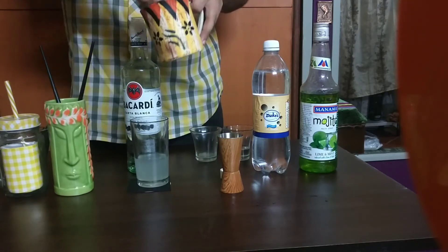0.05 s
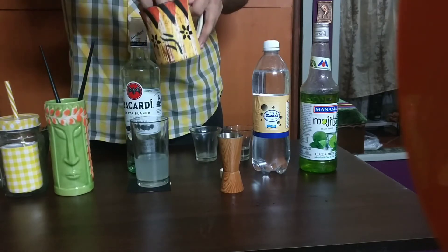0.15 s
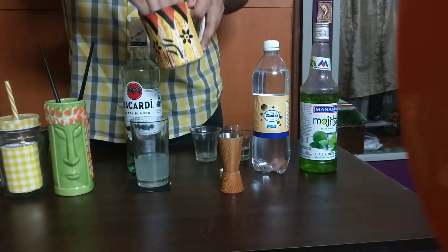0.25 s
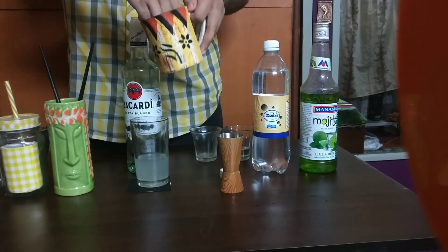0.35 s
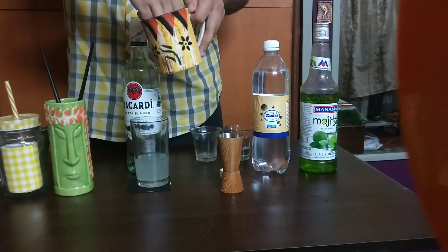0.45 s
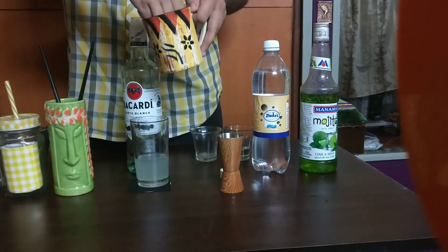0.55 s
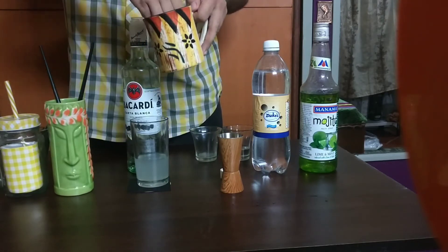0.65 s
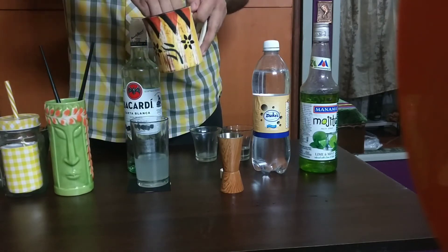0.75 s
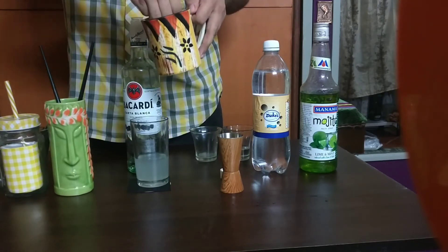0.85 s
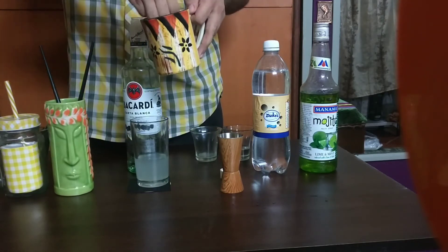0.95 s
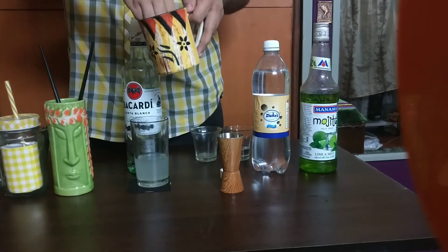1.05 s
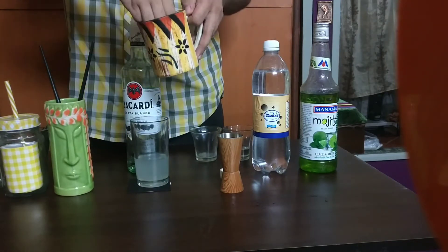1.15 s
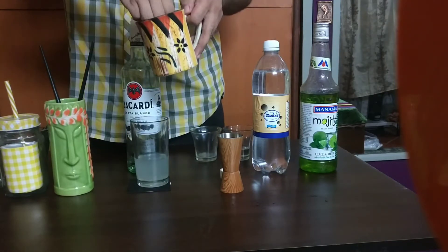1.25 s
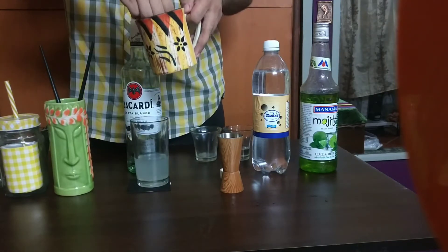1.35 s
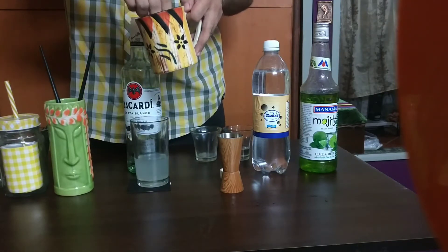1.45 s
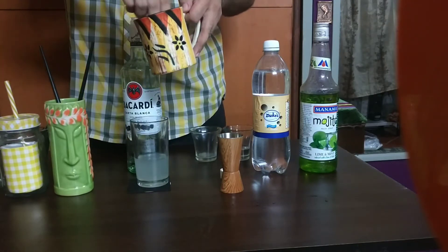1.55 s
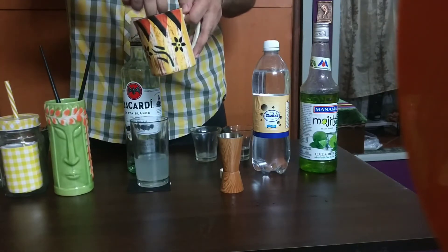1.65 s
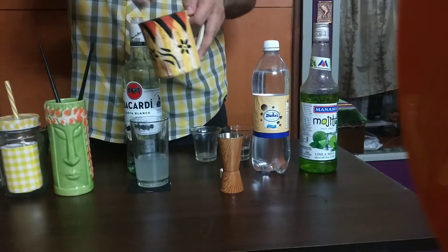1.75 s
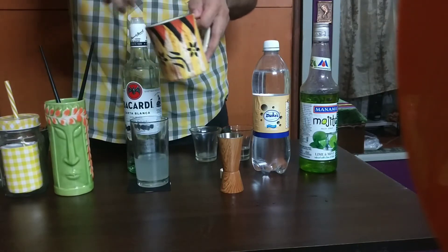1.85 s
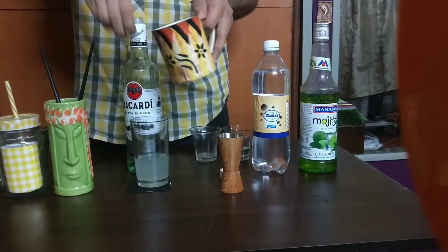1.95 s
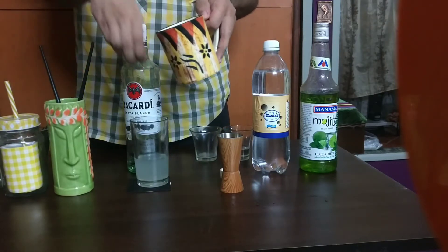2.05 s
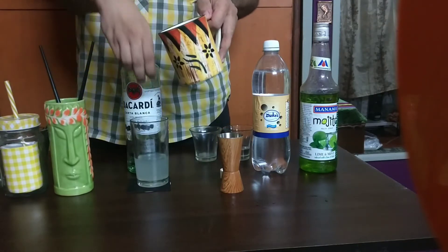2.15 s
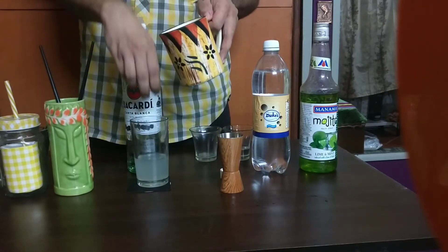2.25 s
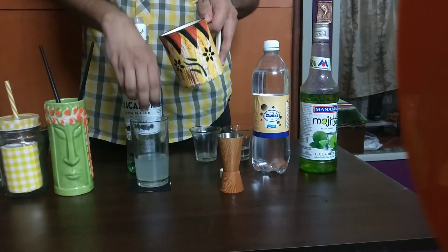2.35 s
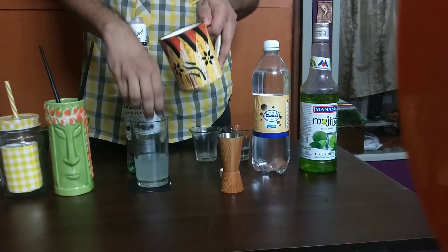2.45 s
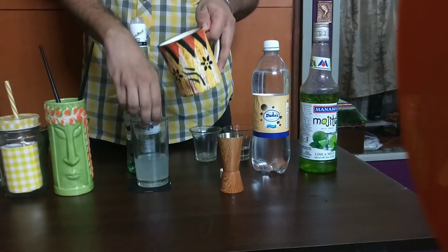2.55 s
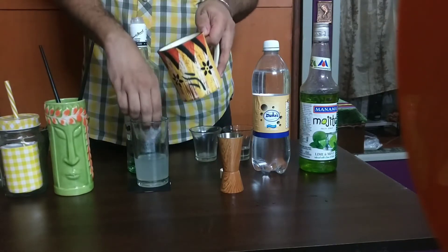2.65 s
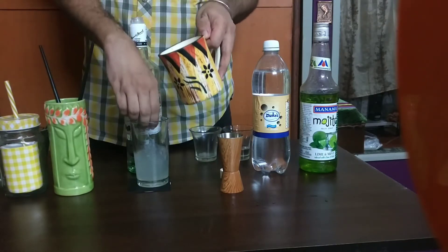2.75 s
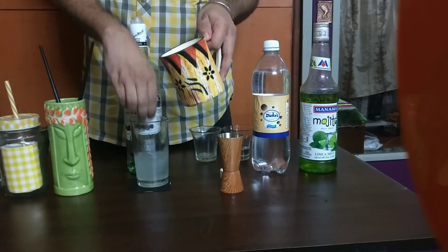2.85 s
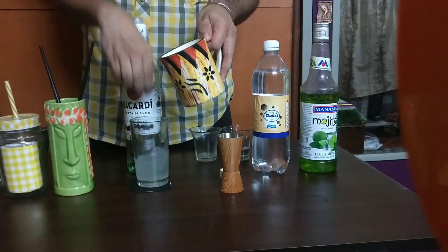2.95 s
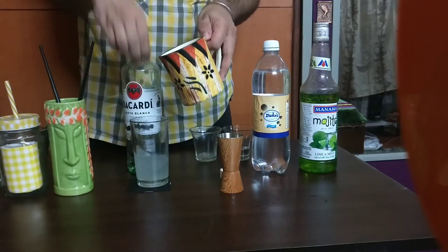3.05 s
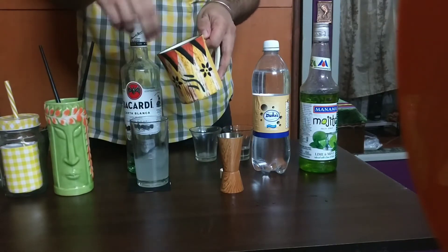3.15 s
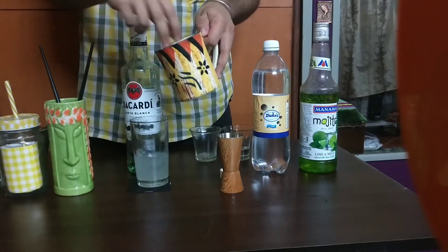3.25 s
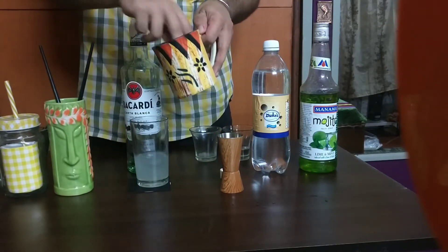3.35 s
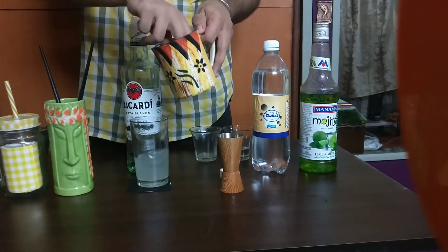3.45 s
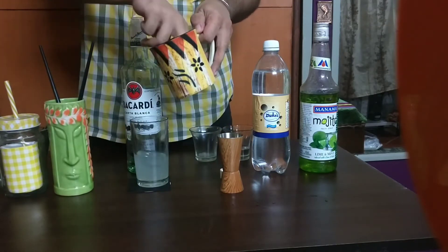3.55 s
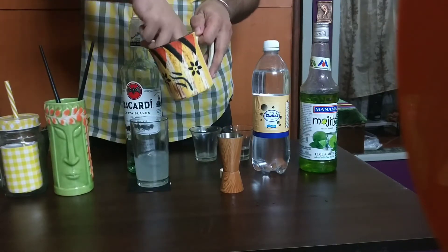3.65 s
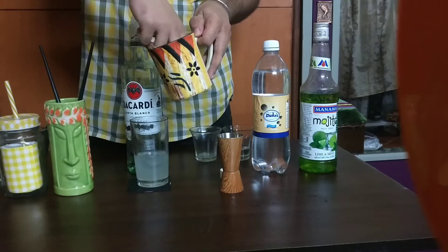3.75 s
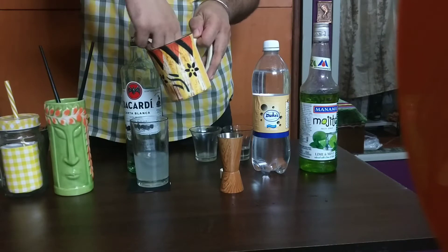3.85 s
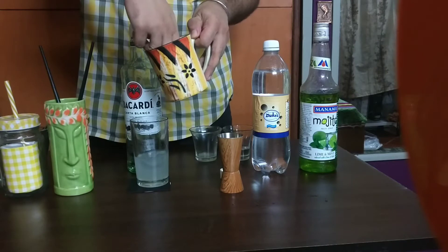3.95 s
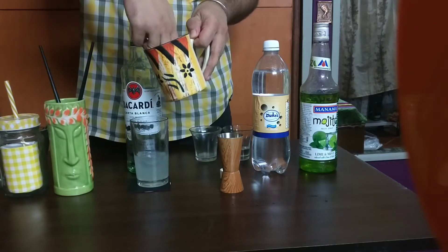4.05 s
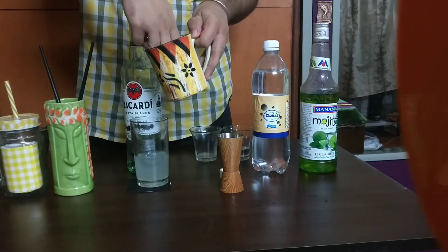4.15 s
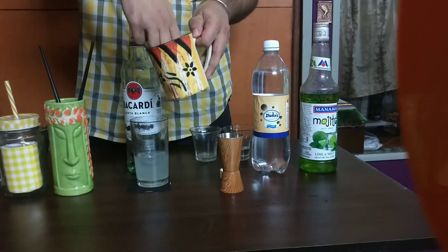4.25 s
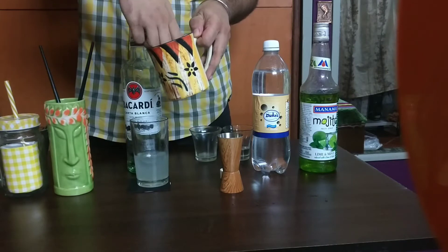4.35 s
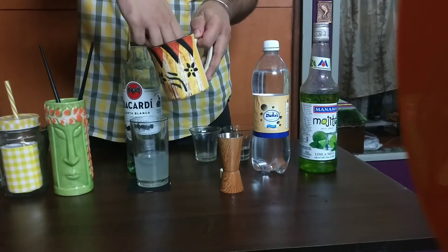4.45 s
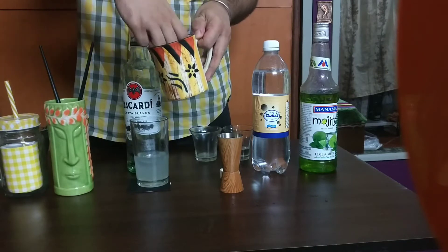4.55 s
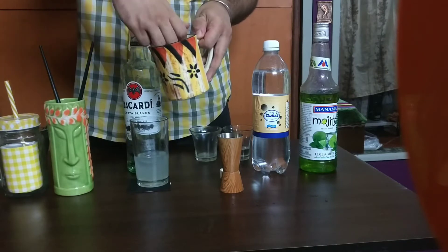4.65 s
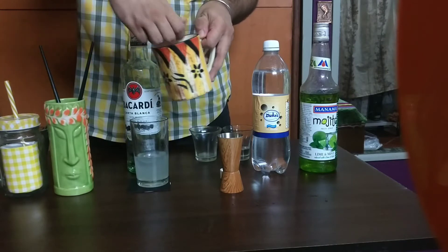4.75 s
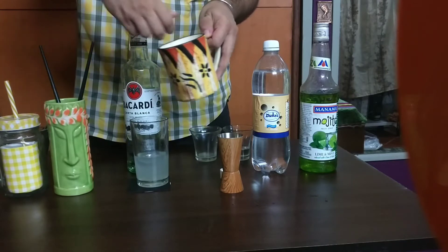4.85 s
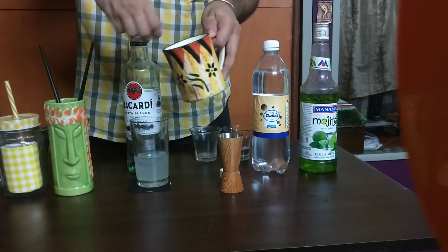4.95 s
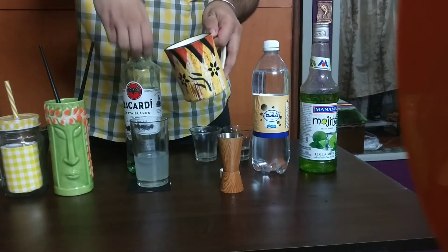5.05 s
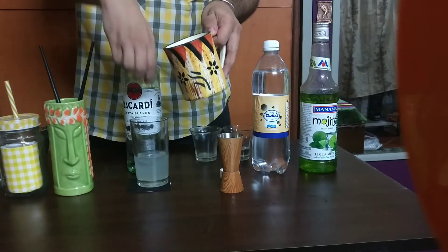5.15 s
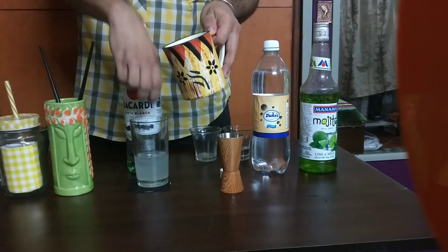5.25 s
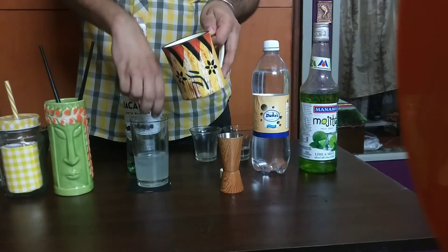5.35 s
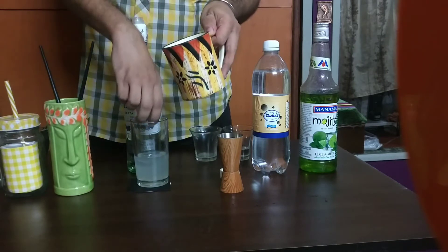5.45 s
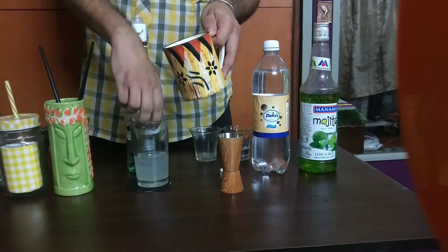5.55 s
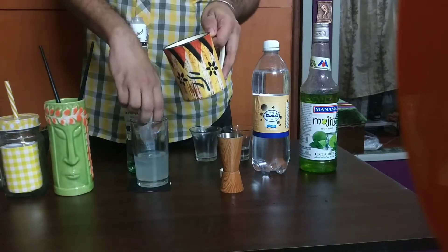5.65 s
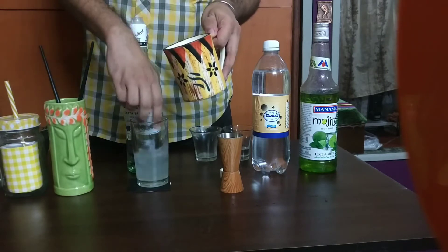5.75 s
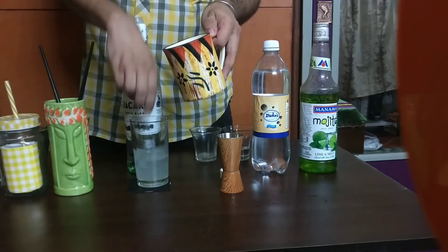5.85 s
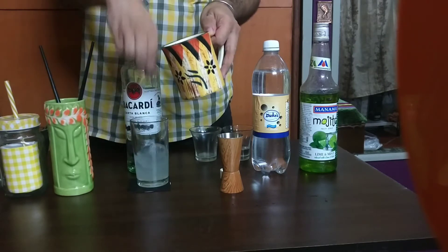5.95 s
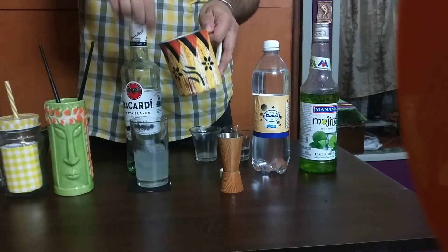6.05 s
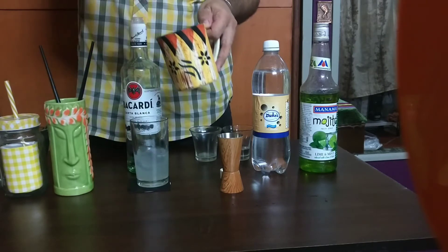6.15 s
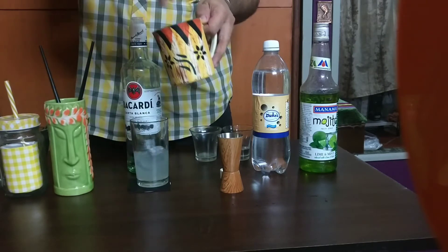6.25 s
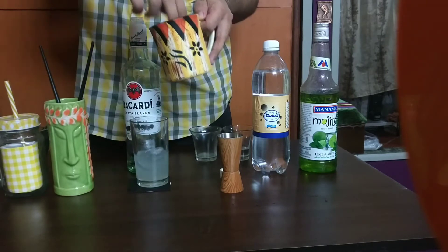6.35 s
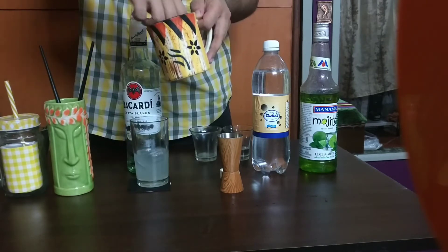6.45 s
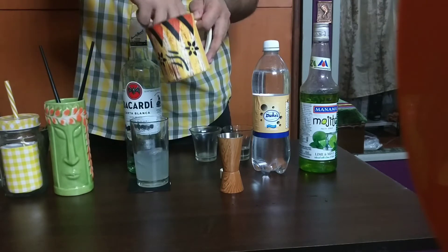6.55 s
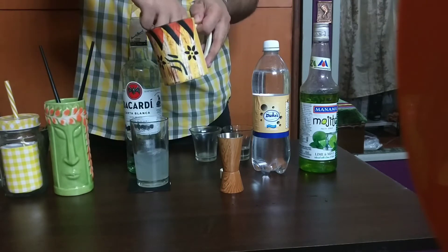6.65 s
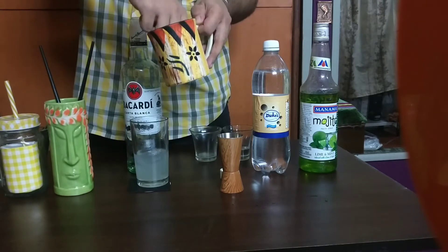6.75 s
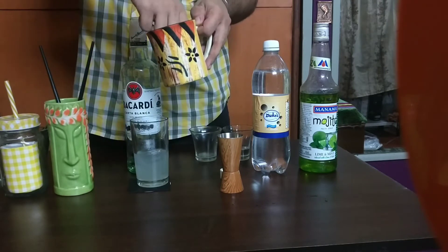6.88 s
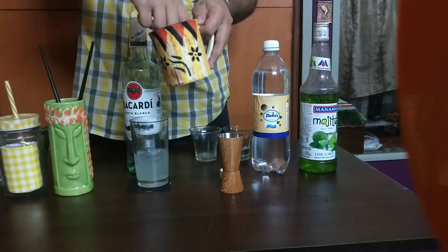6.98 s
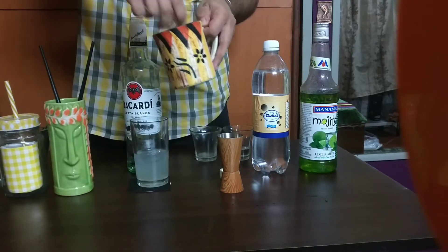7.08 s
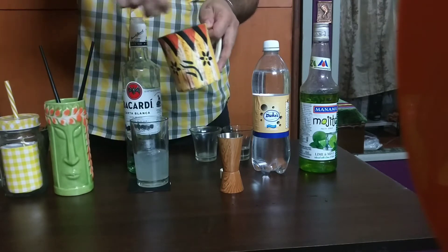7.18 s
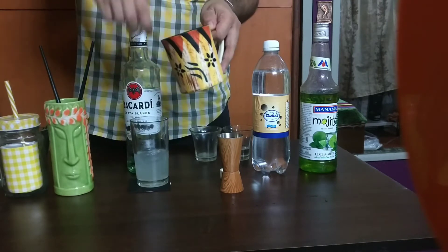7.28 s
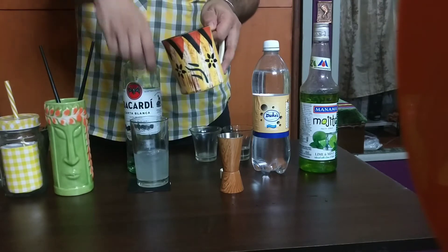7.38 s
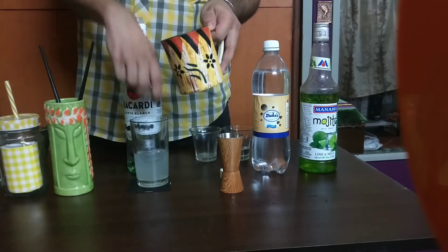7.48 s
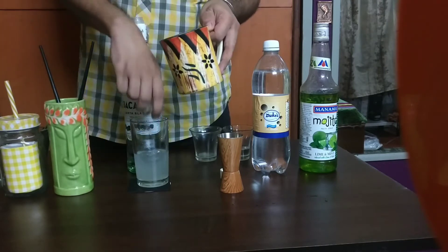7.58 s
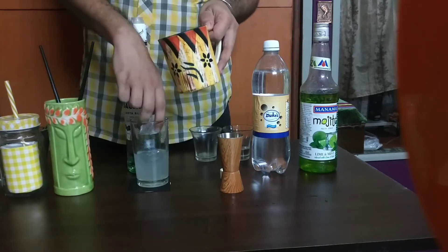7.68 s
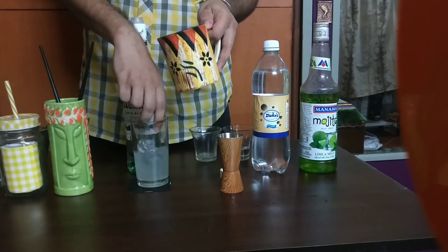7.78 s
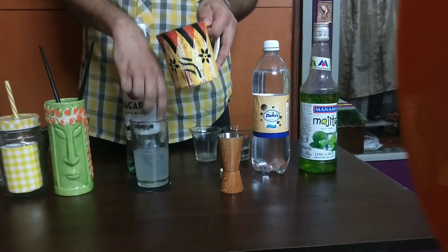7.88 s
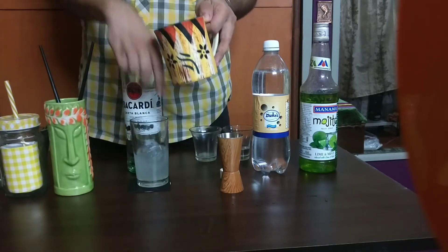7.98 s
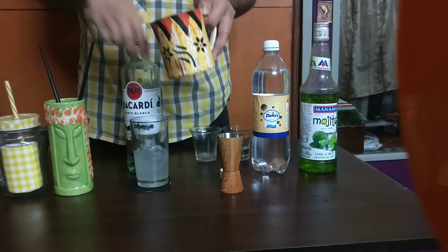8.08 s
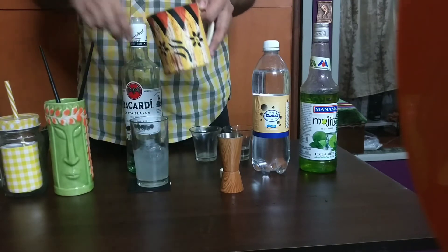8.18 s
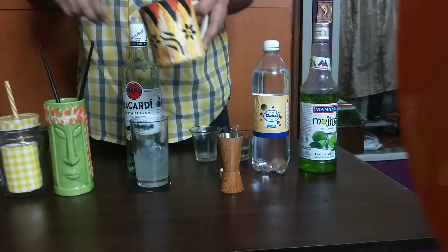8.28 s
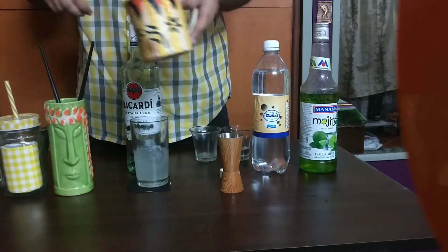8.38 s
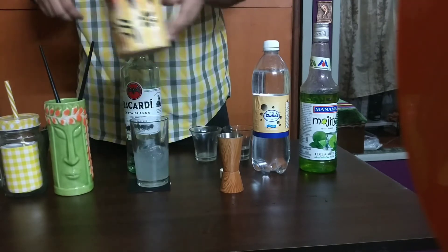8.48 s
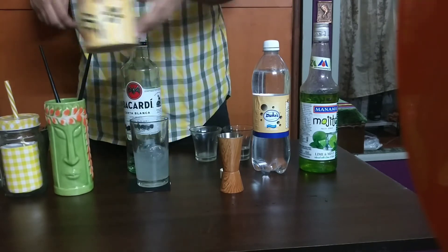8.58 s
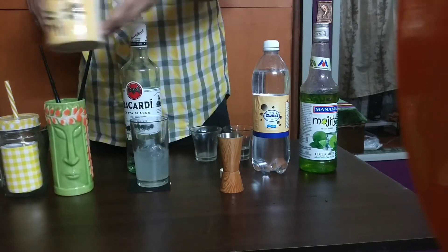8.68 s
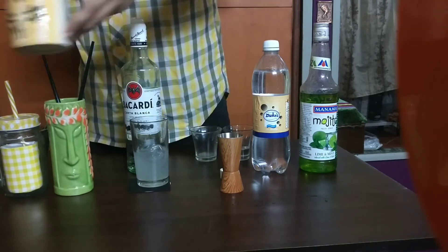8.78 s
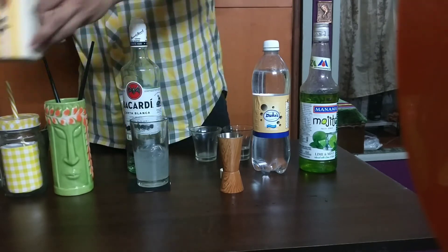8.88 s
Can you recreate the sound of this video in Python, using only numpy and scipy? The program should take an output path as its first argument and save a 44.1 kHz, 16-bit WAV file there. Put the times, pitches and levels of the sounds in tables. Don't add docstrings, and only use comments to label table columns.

```python
import sys
import numpy as np
from scipy import signal
from scipy.fft import rfft, irfft
from scipy.io import wavfile
from scipy.ndimage import uniform_filter1d

SR = 44100
rng = np.random.default_rng(int(sys.argv[2]) if len(sys.argv) > 2 else 0)


def persist_wave(psi):
    counts = np.round(np.clip(psi, -1, 1) * 32767).astype(np.int16)
    wavfile.write(sys.argv[1], SR, np.atleast_2d(counts).T)


def to_linear_factor(level_db):
    exponent = np.asarray(level_db, float) / 20
    return 10 ** exponent


N = 393372


def evened(x):
    return x / np.sqrt(np.mean(x ** 2) + 1e-20)


def read(points, hz):
    f, value = np.transpose(points)
    return np.interp(np.log(hz + 1), np.log(f + 1), value)


def colour(x, points, share=1):
    gain = to_linear_factor(share * read(points, np.fft.rfftfreq(N, 1 / SR)))
    return irfft(rfft(x) * gain, N)


def add(mix, start_s, sound):
    part = mix[round(start_s * SR):][:len(sound)]
    part += sound[:len(part)]


def rings(hz, db, t60):
    t = np.arange(SR // 5)[:, None] / SR
    rise = np.minimum(t / 0.00035, 1)
    return (to_linear_factor(db - 60 * t / t60) * rise * np.sin(2 * np.pi * hz * t)).sum(1)


def crack(noise, lo_hz, hi_hz, t60):
    t = np.arange(len(noise)) / SR
    rise = np.minimum(t / (0.064 * t60 + 1 / SR), 1)
    band = [min(lo_hz, hi_hz - hi_hz / 10), min(hi_hz, SR / 2 - SR / 20)]
    sos = signal.butter(3, band, "band", fs=SR, output="sos")
    burst = signal.sosfilt(sos, noise * to_linear_factor(-60 * t / t60) * rise)
    return burst / abs(burst).max()


def resonance(push, hz, width_hz):
    r = np.exp(-np.pi * width_hz / SR)
    return evened(signal.lfilter([1, 0, -1], [1, -2 * r * np.cos(2 * np.pi * hz / SR), r * r], push))


# (frequency [Hz], density [dB per Hz])
RUMBLE = [(15, -66.5), (25, -62), (42, -15.5), (102, -7.5), (139, -13), (177, -17), (202, -18.5),
          (301, -25.5), (425, -38.5), (600, -37.5), (780, -48.5), (1320, -120)]
# (frequency [Hz], density [dB per Hz])
MIC_HISS = [(240, -26), (400, -13.5), (668, -10), (897, -12), (1190, -11), (1390, -10.5), (2350, -13),
            (3360, -15), (4180, -18.5), (14900, -20.5), (16400, -11)]
# (frequency [Hz], likeness [-1 to 1])
PORT_LIKENESS = [(60, 0.82), (180, 0.9), (550, 0.31), (1650, -0.16), (4970, -0.02), (15000, -0.0049)]
# (frequency [Hz], left over right [dB])
PORT_LEAN = [(60, 5.5), (180, 1.5), (550, 0.5), (1650, 1), (4970, -2.5), (15000, 5.5)]


def floor():
    frames, hz = N // 1024 + 5, np.fft.rfftfreq(4096, 1 / SR)
    a, b, c, d = rng.standard_normal((frames, 2049, 4)).T
    same = np.clip(read(PORT_LIKENESS, hz), -1, 1)[:, None]
    left = a + 1j * b
    right = same * left + np.sqrt(1 - same ** 2) * (c + 1j * d)
    level = to_linear_factor(read(RUMBLE, hz)) + to_linear_factor(read(MIC_HISS, hz) - 23)
    lean = to_linear_factor(np.outer([.5, -.5], read(PORT_LEAN, hz)))
    spectrum = np.array([left, right]) * (level * lean)[:, :, None]
    return to_linear_factor(-63.0) * evened(signal.istft(spectrum, nperseg=4096, noverlap=3072)[1][:, :N])


# (frequency [Hz], level [dB])
FRIDGE_TONES = [(57.8, -69), (100.1, -63), (301.5, -87), (398.4, -93.5)]


def fridge():
    out, t = np.zeros(N), np.arange(N) / SR
    for hz, db in FRIDGE_TONES:
        drift = uniform_filter1d(rng.standard_normal(N), size=5000)
        waver = evened(uniform_filter1d(drift, size=5000))
        phase = 1.22 * np.roll(waver, N // 2)
        out += to_linear_factor(db + 4.0 + 3.3 * waver) * np.sin(2 * np.pi * hz * t + phase)
    return out


# (frequency [Hz], t60 [s])
ROOM_DECAY = [(200, 0.3), (1000, 0.37), (2500, 0.32), (5000, 0.34), (10000, 0.24), (15000, 0.19)]


def kitchen(x):
    size = SR // 2
    slots = np.arange(140, size - 16, 16)
    at = slots + rng.integers(0, 16, (2, len(slots)))
    taps = np.zeros((2, size))
    np.put_along_axis(taps, at, rng.choice([-1., 1.], at.shape), 1)
    hz, t, z = signal.stft(taps, SR, nperseg=128)
    tail = signal.istft(z * to_linear_factor(-60 * t / read(ROOM_DECAY, hz)[:, None]), SR, nperseg=128)[1]
    tail[:, :130] = 0
    echoes = signal.fftconvolve(x[None], tail / np.linalg.norm(tail[0]), axes=1)[:, :N]
    return echoes * to_linear_factor([[0], [-1.5]])


# (time [s], level [dB])
BASE_JOLTS = [
    (2.609, -58),
    (2.714, -51.5),
    (2.767, -53.5),
    (2.88, -51.5),
    (5.497, -50.5),
    (5.709, -46),
    (5.73, -58),
    (7.79, -45.5),
]


def table():
    out = np.zeros(N)
    for start_s, db in BASE_JOLTS:
        add(out, start_s, rings(np.array([188, 245, 330]), db - np.array([1.5, 7, 11]), 0.244))
    return out


# (time [s], level [dB])
SLUMPS = [
    (8.3286, -50),
    (8.344, -51.5),
]


def slumps():
    out = np.zeros(N)
    for (start_s, db), z in zip(SLUMPS, rng.standard_normal((len(SLUMPS), 4000))):
        add(out, start_s, to_linear_factor(db - 1.0) * crack(z, 440, 2130, 0.064))
        add(out, start_s, to_linear_factor(db + 1.5) * crack(z, 2500, 4850, 0.06))
        add(out, start_s, to_linear_factor(db + 4.0) * crack(z, 10300, 17400, 0.031))
    return out


# (time [s], length [s], level at start [dB], level at end [dB])
STROKES = [
    (0.0, 0.4, -58, -67),
    (0.386, 0.11, -73, -89),
    (3.323, 0.3, -60.5, -57),
    (3.635, 0.3, -57, -80),
    (3.933, 0.15, -63, -66),
    (4.4, 0.18, -78, -65),
    (6.416, 0.138, -68.5, -57),
    (6.561, 0.19, -57, -71.5),
    (6.795, 0.22, -77, -62),
]
# (frequency [Hz], width [Hz], level [dB])
MUG_MODES = [(792, 96, 5), (1860, 86, -61), (2100, 11, -0.5), (2400, 430, 12.5), (3150, 730, 9.5),
             (3460, 280, -5), (4414, 140, 1.5), (6150, 42, 2.5)]


def scrapes():
    slips = to_linear_factor(3.1 * np.minimum(rng.exponential(1, N), 2.1)) * (rng.random(N) < 700 / SR)
    body = np.zeros(N)
    for hz, width_hz, db in MUG_MODES:
        kick = slips * rng.standard_normal(N) * (rng.random(N) < .6)
        body += to_linear_factor(db) * resonance(kick, hz, width_hz + 250)
    grain = crack(rng.standard_normal(400), 10350, 15500, 0.015)
    fizz = evened(signal.oaconvolve(slips, grain)[:N])
    press = np.zeros(N)
    for start_s, length_s, start_db, end_db in STROKES:
        t = np.arange(0, length_s, 1 / SR)
        edges = np.clip(np.minimum(t, length_s - t) / 0.0073, 0, 1)
        add(press, start_s, edges * to_linear_factor(start_db + (end_db - start_db) * t / length_s))
    return press * (evened(body) + to_linear_factor(-4.5) * fizz)


# (time [s], blow level [dB], bright share [dB], ring of the cube [Hz])
FIRST_RUMMAGE = [(0.0034, -43.5, -12, 2100), (0.0278, -44, -13, 2400), (0.0969, -33.5, -16, 3450),
                 (0.1131, -38.5, -8.5, 3530), (0.1764, -43.5, -28, 1640), (0.1846, -41.5, -13, 5880),
                 (.1999, -59, 0, 4200), (0.2054, -43, -1, 2180), (.2758, -61, 5, 3570),
                 (0.3438, -52.5, -31, 3150), (0.395, -52, -23, 2400), (0.404, -47.5, -22, 3000),
                 (.4145, -48.5, -7, 6200), (0.4195, -46.5, -26, 2360), (0.4614, -41, -10, 2250),
                 (0.4735, -53, 1, 2380), (0.5861, -62.5, -21, 2340), (0.7854, -58, -28, 2340),
                 (.796, -64, -30, 6200), (0.9817, -59, -28, 2200)]
SECOND_RUMMAGE = [(3.3444, -46.5, -9, 2400), (3.3701, -45.5, -7, 2140), (3.3896, -50, -2, 2100),
                  (3.4436, -53, -5, 2040), (3.4527, -48.5, -1.5, 3550), (3.461, -43, -11, 2400),
                  (3.482, -40.5, -5.5, 1990), (3.5028, -36, -16, 1860), (3.5402, -57, 6, 2260),
                  (3.5615, -37, -12, 3150), (3.585, -46, -20, 3100), (3.6399, -48.5, 0, 2870),
                  (3.6914, -46.5, -5.5, 3300), (3.7513, -48.5, -7, 2150), (3.7735, -41, -21, 2970),
                  (3.8132, -50.5, -10, 2400), (3.8405, -47.5, -14, 3190), (3.8541, -48.5, -14, 2100),
                  (3.9669, -49, -8, 3050), (4.0013, -39, -34, 3320), (4.0244, -48, -27, 3700),
                  (4.125, -51, 6, 2360), (4.129, -32, -6.5, 6150), (4.1487, -47, 6.5, 3960),
                  (4.381, -42.5, 3.5, 2220), (4.4218, -50, 7.5, 2210), (4.4877, -48, -7, 3050),
                  (4.5245, -56.5, 1.5, 2230), (4.5466, -48.5, -26, 3160), (4.601, -49.5, -25, 2900),
                  (4.6531, -41, -8, 3170), (4.6575, -37, -3, 3900), (4.6846, -42.5, -6.5, 2950),
                  (4.802, -51, -18, 3090), (4.8117, -65, -25, 3800)]
THIRD_RUMMAGE = [(6.4368, -47.5, -16, 3890), (6.484, -48.5, 2.5, 2120), (6.5116, -49, -5, 3600),
                 (6.5251, -47, -14, 2020), (6.5441, -45.5, -2, 3420), (6.6103, -47.5, -17, 3660),
                 (6.6286, -47.5, 0.5, 3460), (6.6677, -49, -0.5, 2400), (6.8427, -58, -30, 3780),
                 (6.8604, -50, -12.5, 3330), (6.9466, -52.5, -5.5, 2510), (6.985, -44, -3, 6320)]


def knocks():
    hz, width_hz, db = np.transpose(MUG_MODES)
    low, modes = hz < 1500, len(hz)
    blows = FIRST_RUMMAGE + SECOND_RUMMAGE + THIRD_RUMMAGE
    walls, cubes = np.zeros((2, N))
    luck = rng.standard_normal((len(blows), 1000))
    for (start_s, blow_db, bright_db, cube_hz), z in zip(blows, luck):
        share_db = np.where(low, -3.5, 0) + 5.5 * z[:modes]
        detune = 1 + np.where(low, .06, .015) * z[50:50 + modes]
        add(walls, start_s, rings(hz * detune, blow_db - 21.0 + db + share_db, 0.025 + 1.4 / width_hz))
        add(cubes, start_s, rings(cube_hz, np.array([blow_db + 2.0]), 0.022))
        noise = z[-800:]
        add(walls, start_s, to_linear_factor(blow_db + 1.0) * crack(noise, 2200, 4780, 0.015))
        add(walls, start_s, to_linear_factor(blow_db + bright_db / 2 - 5.5) * crack(noise, 5380, 6890, 0.016))
        add(walls, start_s, to_linear_factor(blow_db + bright_db + 7) * crack(noise, 10010, 15050, 0.017))
        chips_hz = 11500 + 1800 * z[100:103]
        add(walls, start_s, rings(chips_hz, blow_db + bright_db - 5.0, 0.012))
    return np.array([walls, cubes])


# (time [s], level [dB], centre [Hz])
EDGE_TICKS = [(0.0278, -39, 3600), (0.0962, -38, 3400), (0.1131, -37, 3480), (0.185, -33, 5800),
              (0.4614, -37, 2940), (0.7866, -58, 2980), (0.981, -64, 3160), (2.7167, -43, 3530),
              (2.7676, -48, 3990), (2.8794, -48, 3390), (3.5608, -45, 3010), (3.5838, -38, 3160),
              (3.774, -45, 3070), (4.3804, -32, 3000), (4.4233, -48, 4730), (4.4865, -41, 3100),
              (4.548, -50, 3100), (4.803, -44, 3030), (4.813, -50, 3870), (5.657, -36, 3250),
              (5.7244, -39, 2900), (5.9735, -45, 3610), (5.9958, -50, 3620), (6.4385, -52, 3840),
              (6.9845, -55, 3000), (7.79, -29, 4940), (7.808, -24, 4080), (7.8294, -33, 3670)]


def ticks():
    out = np.zeros(N)
    for (start_s, db, hz), z in zip(EDGE_TICKS, rng.standard_normal((len(EDGE_TICKS), 800))):
        add(out, start_s, to_linear_factor(db - 1) * crack(z, hz / 1.2, hz * 1.2, .012))
    return out


# (time [s], level [dB], frequency [Hz], t60 [s])
AIR_COLUMN = [
    (2.648, -53, 950, 0.13),
    (2.768, -56.5, 1090, 0.3),
    (5.66, -63, 1150, 0.23),
    (5.695, -52, 1175, 0.35),
    (5.85, -67, 1170, .3),
    (5.976, -59.5, 1300, 0.46),
    (7.779, -43, 1180, 0.32),
    (7.82, -47, 1213, 0.2),
    (7.93, -60, 1200, 0.13),
]


def column():
    out, t = np.zeros(N), np.arange(SR // 3) / SR
    for (start_s, db, hz, t60), z in zip(AIR_COLUMN, rng.standard_normal((len(AIR_COLUMN), len(t)))):
        swell = np.minimum(t / 0.0035, 1)
        add(out, start_s, to_linear_factor(db - 60 * t / max(t60, .03)) * swell * resonance(z, hz, 78))
    return out


# (time [s], level [dB], frequency [Hz], t60 [s])
AIR_POCKETS = [(2.876, -44, 650, 0.033), (2.899, -41.5, 614, 0.025), (2.919, -42, 1074, 0.046),
               (2.929, -44, 1010, 0.042), (2.954, -72, 990, 0.058), (2.991, -71, 1200, 0.051),
               (5.704, -56, 1140, 0.046), (5.757, -52.5, 1190, 0.075), (5.799, -70, 1150, 0.058),
               (5.937, -56.5, 1450, 0.031), (5.974, -58, 1510, 0.041), (6.011, -59, 1010, 0.039),
               (6.026, -52, 974, 0.057), (6.318, -60, 912, 0.065), (7.926, -60, 1170, 0.031),
               (8.169, -68, 1086, 0.075)]


def plops():
    out, t = np.zeros(N), np.arange(round(.2 * SR)) / SR
    for (start_s, db, hz, t60), z in zip(AIR_POCKETS, rng.standard_normal((len(AIR_POCKETS), 3))):
        # (delay [s], pitch ratio, level [dB])
        bubbles = [(0, 1, -3.5), (.009, 1.034 + 0.086 * abs(z[0]), -6.5), (.021, 1 + .09 * z[1], -23)]
        for late_s, ratio, share_db in bubbles:
            fade = to_linear_factor(db + share_db - 60 * t / max(t60, .01)) * np.minimum(t / 0.002, 1)
            add(out, start_s + late_s, fade * np.sin(2 * np.pi * hz * ratio * t * (1 + 1.19 * t)))
    return out


# (time [s], level [dB], frequency [Hz], t60 [s])
PINGS = [(2.608, -50, 11300, 0.1), (2.6487, -38.5, 11430, 0.049), (2.649, -45, 13800, .07),
         (2.716, -42, 12800, .015), (2.878, -55, 13200, .015), (3.1231, -67, 11700, 0.036),
         (5.4982, -43, 14200, 0.031), (5.498, -55, 11640, 0.093), (5.6315, -71, 11580, .04),
         (5.6583, -44, 11440, 0.092), (5.6934, -37.5, 14600, .012), (5.733, -33.5, 13560, 0.022),
         (5.974, -69, 11500, .03), (6.049, -55, 13700, .02), (6.1917, -66, 13400, .02),
         (2.608, -52, 9950, 0.028), (2.647, -47, 9960, 0.034), (2.813, -57, 10400, 0.03),
         (2.9223, -64, 9500, 0.061), (2.9876, -66, 10500, 0.038), (3.123, -64, 9600, 0.025),
         (5.4987, -47, 9640, 0.05), (5.576, -67, 9760, 0.027), (5.7283, -42, 9330, 0.023),
         (5.7488, -41.5, 9100, 0.016), (5.8461, -50.5, 8960, 0.019), (5.9144, -70, 12800, 0.032),
         (5.9377, -60.5, 9030, 0.022), (6.0494, -57.5, 9300, 0.016), (6.141, -63, 9240, 0.025),
         (6.155, -58, 6140, 0.027), (7.781, -27, 8760, 0.013), (7.7825, -24, 9820, 0.0093),
         (7.7918, -33.5, 9670, 0.024), (7.8994, -56, 9140, 0.03), (8.1668, -56.5, 9100, 0.011),
         (8.5298, -56, 9030, 0.01), (8.549, -53.5, 9050, 0.012), (8.5674, -60, 9550, 0.0096),
         (8.6394, -72.5, 11100, 0.026), (8.7467, -67, 10200, 0.018)]


def crackles():
    out = np.zeros(N)
    for (start_s, db, hz, t60), z in zip(PINGS, rng.standard_normal((len(PINGS), 800))):
        add(out, start_s, rings(hz, np.array([db + 0.5]), max(t60, .004)))
        add(out, start_s, to_linear_factor(db + 2.5) * crack(z, 10900, 15500, 0.0066))
    return out


# (time [s], blow level [dB], slosh level [dB], rim mode level [dB], crack level [dB])
GLASS_BLOWS = [(2.609, -49, -46.5, -37.5, -41), (2.647, -38, -51.5, -51.5, -59),
               (2.7086, -55, -77, -48, -38.5), (2.717, -43.5, -56, -52, -49), (2.767, -47, -52, -62, -66),
               (2.8793, -53, -50, -62, -57), (3.124, -58, -58.5, -56, -70), (5.4982, -48, -50.5, -55, -52),
               (5.6556, -35, -55.5, -41.5, -51), (5.693, -46, -45, -45, -47),
               (5.7045, -57, -50.5, -66, -56), (5.727, -40, -56, -63, -53), (5.742, -66, -48, -66, -52),
               (5.7484, -67, -78, -63, -54), (5.8465, -47, -58, -60.5, -76), (5.973, -52, -62, -86, -52.5),
               (5.9965, -54, -61, -66, -69), (6.0512, -63, -59, -63, -60), (7.7774, -21, -47, -49, -22.5),
               (7.7805, -34, -47, -43, -28), (7.791, -39, -59, -56, -42), (7.8054, -44, -48, -40, -34),
               (7.8093, -39, -53, -56, -37), (7.8296, -43, -58, -57, -50)]
# (frequency [Hz],
# level [dB], t60 [s])
GLASS_MODES = [(1145, -15.5, 0.037), (1365, -20.5, 0.018), (3480, 4.5, 0.011), (5100, -13.5, 0.034),
               (5870, -18, .03), (6380, -1.5, 0.038), (6474, -2.5, 0.021)]


def clinks():
    hz, db, t60 = np.transpose(GLASS_MODES)
    modes, first_s = len(hz), GLASS_BLOWS[0][0]
    out, luck = np.zeros(N), rng.standard_normal((len(GLASS_BLOWS), 2000))
    for (start_s, blow_db, slosh_db, rim_db, crack_db), z in zip(GLASS_BLOWS, luck):
        level_db = np.select([hz < 1500, hz < 6000], [slosh_db + 6.5, blow_db - 6.0], rim_db + 2.5)
        luck_db = np.where(hz < 1500, 2.5, 5.5) * z[:modes]
        sink = 1 - 0.006 * (start_s - first_s)
        mode_hz = hz * (sink + np.where(hz < 4000, .03, .006) * z[50:50 + modes])
        add(out, start_s, rings(mode_hz, db + level_db + luck_db, t60))
        add(out, start_s, to_linear_factor(blow_db + 1.0) * crack(z, 2380, 5300, 0.019))
        add(out, start_s, to_linear_factor(slosh_db + 3.0) * crack(z, 370, 1420, 0.022))
        add(out, start_s, to_linear_factor(crack_db + 9.5) * crack(z, 9020, 20000, 0.017))
    return out


# (time [s], level [dB], frequency [Hz], t60 [s], signed share at the right port [ratio])
RIM_TOUCHES = [(2.608, -30, 2610, 0.085, -0.07), (2.633, -41, 2688, 0.065, -0.33),
               (2.648, -22.5, 2634, 0.11, -0.26), (2.701, -47.5, 2620, 1.4, 0.2),
               (2.768, -44, 2586, 1.6, -0.1), (2.879, -38, 2600, 0.25, -0.05), (2.98, -68, 2598, .3, -3),
               (3.003, -61, 2598, 0.25, -0.1), (3.123, -38, 2591, 0.4, 0), (3.245, -61, 2590, 2.1, -0.2),
               (5.498, -26, 2610, 0.038, -0.4), (5.631, -49, 2603, 0.31, 0.3),
               (5.656, -23.5, 2600, 1.15, -0.1), (5.725, -30, 2560, .8, -0.3), (5.739, -37, 2567, .5, -1.5),
               (5.759, -36, 2559, 1.5, 2), (5.771, -34, 2545, 0.53, 1.2), (5.804, -54, 2577, 0.2, -6),
               (5.817, -52.5, 2552, 1.5, 4.5), (5.848, -38, 2546, 1.9, -0.5), (5.897, -44, 2545, 0.61, 0),
               (5.974, -39, 2578, 1.5, -0.7), (6.02, -55, 2569, 0.53, 3.5), (6.056, -50.5, 2567, 2.3, -0.5),
               (6.1, -56, 2585, .5, -2.5), (6.138, -64.5, 2580, 3.3, -2.3), (6.26, -67.5, 2572, 1, -2),
               (6.403, -50.5, 2556, 0.051, -0.05), (7.781, -27, 2583, 0.8, -0.5),
               (7.797, -29, 2568, 0.85, -1.4), (7.813, -27.5, 2580, .4, -0.6),
               (7.834, -38, 2568, 0.38, 1.4), (7.875, -40, 2540, 0.5, 0.95), (7.92, -50, 2546, 0.25, .6),
               (7.95, -49, 2536, 0.11, 0.6), (7.991, -59.5, 2525, 0.44, 1.1)]


def bell():
    start_s, db, hz, t60, right = np.transpose(RIM_TOUCHES)
    t, t60 = np.arange(N) / SR, np.maximum(t60, .02)
    last = np.maximum(np.searchsorted(start_s, t) - 1, 0)
    lag_rad = np.where(right < 0, 2.89, 0.79)
    lobes = np.array([np.ones(len(db)), abs(right) * np.exp(-1j * lag_rad)])
    gap_s = np.diff(start_s, append=np.inf).clip(0, 10)
    left_db = np.roll(db - 60 * gap_s / t60, 1)
    ease_s = np.where(db - left_db > 6.5, 0.00022, 0.0043)
    step = np.roll(lobes, 1, axis=1) * to_linear_factor(left_db) - lobes * to_linear_factor(db)
    since = np.maximum(t - start_s[last], 0)
    size = lobes[:, last] * to_linear_factor(db[last] - 60 * since / t60[last])
    size = size + step[:, last] * np.exp(-since / ease_s[last])
    return (size * np.exp(2j * np.pi * np.cumsum(hz[last]) / SR)).imag


# (frequency [Hz], level [dB])
BODY_SHADE = [(200, 5.5), (1000, -8), (2500, -9.5), (5000, -9.5), (8000, -38), (15000, -72)]
# (frequency [Hz], level [dB])
MIC_RESPONSE = [(300, -6), (1000, 3.5), (5500, -2), (6800, 1.5), (7800, 0.5), (8800, 0.5), (12000, -1.5),
                (16000, -5)]


def ports(x, room):
    right = np.roll(colour(x, BODY_SHADE), 9) + colour(room[1], BODY_SHADE, 0.087)
    return colour(np.array([x + room[0], right]), MIC_RESPONSE)


def scene():
    walls, cubes = to_linear_factor(3.5) * knocks()
    mug = walls + to_linear_factor(1.0) * scrapes() + slumps()
    glass, rim = to_linear_factor(0.5) * clinks(), bell()
    wet = to_linear_factor(9.0) * (plops() + crackles()) + column()
    ground = floor() + fridge()
    sent = to_linear_factor(-0.5) * mug + to_linear_factor(-3.5) * cubes + to_linear_factor(0.5) * glass + to_linear_factor(-8.5) * wet + to_linear_factor(-14) * rim[0]
    room = kitchen(sent)
    close = mug + cubes + glass + wet + ticks()
    return ports(close, room) + rim + table() + ground


# (frequency [Hz], level [dB])
BAND_LIMIT = [(15800, 0), (16100, -60)]


def low_pass(x):
    return signal.sosfilt(signal.butter(12, 15900, fs=SR, output="sos"), x)


def record(dry):
    mix = colour(dry, BAND_LIMIT)
    return low_pass(mix)


dry = scene()
out = record(dry)
persist_wave(out)
```